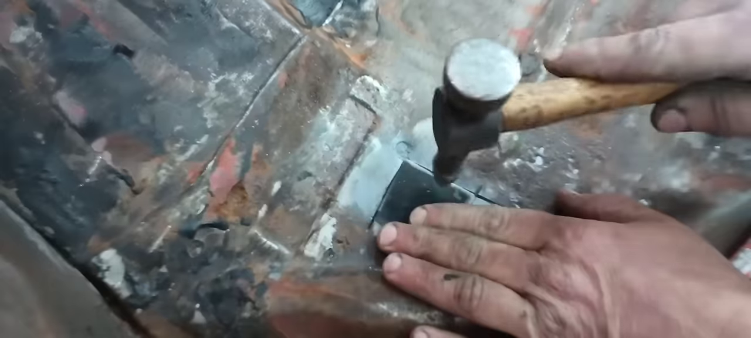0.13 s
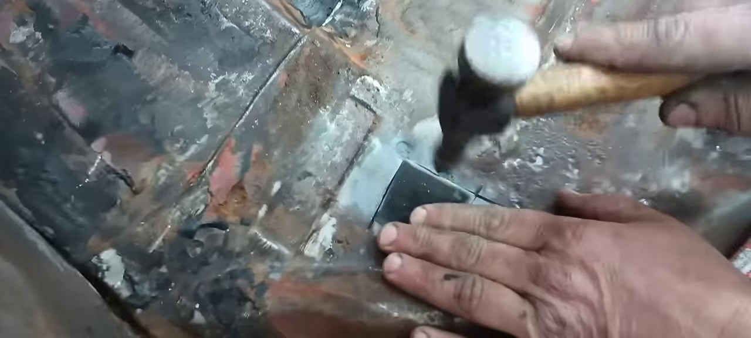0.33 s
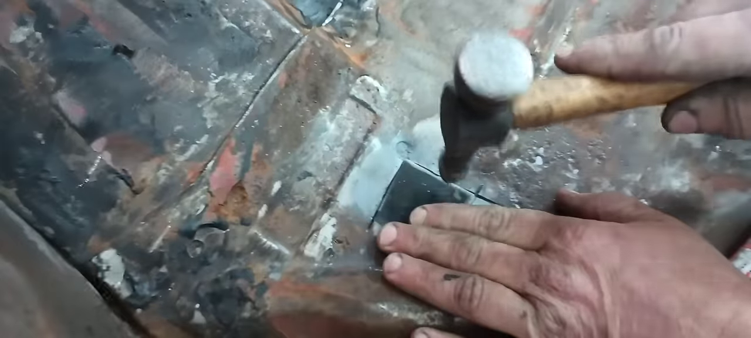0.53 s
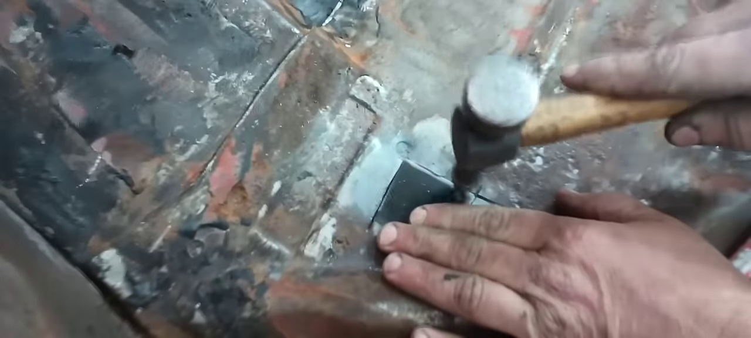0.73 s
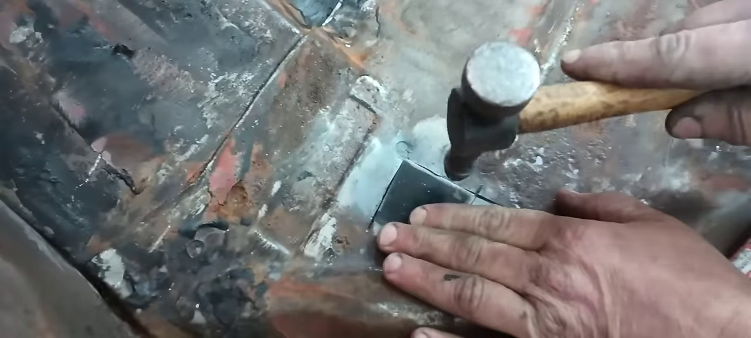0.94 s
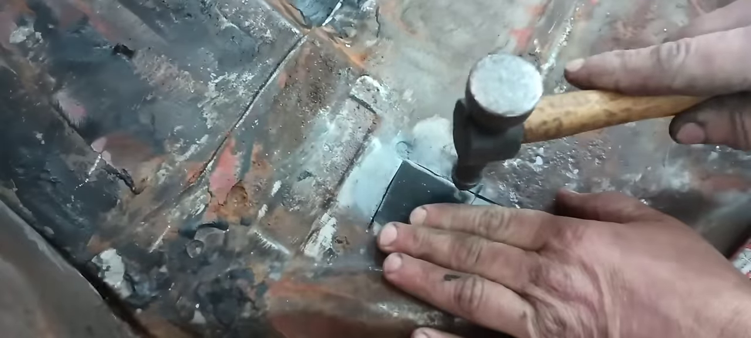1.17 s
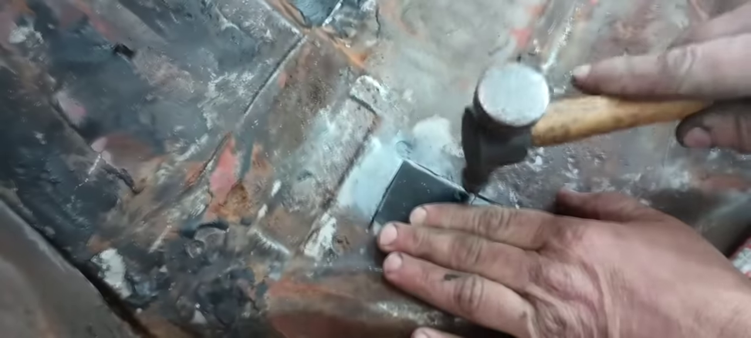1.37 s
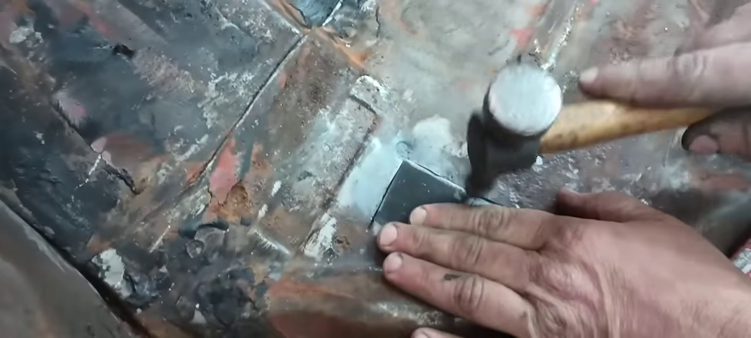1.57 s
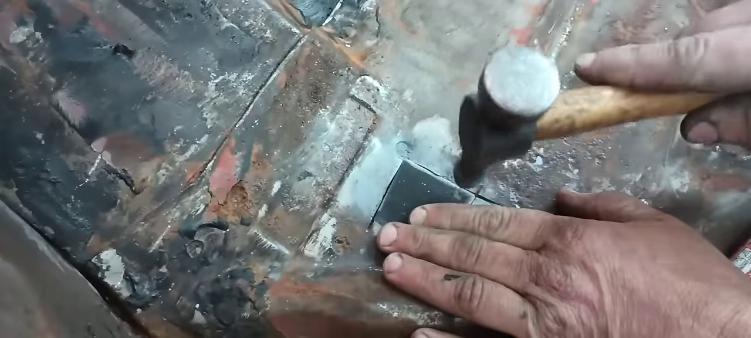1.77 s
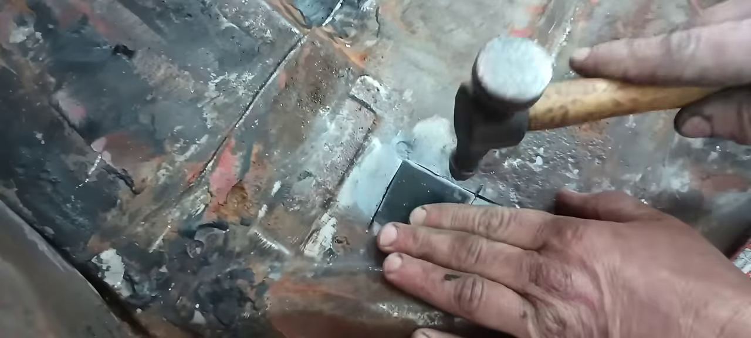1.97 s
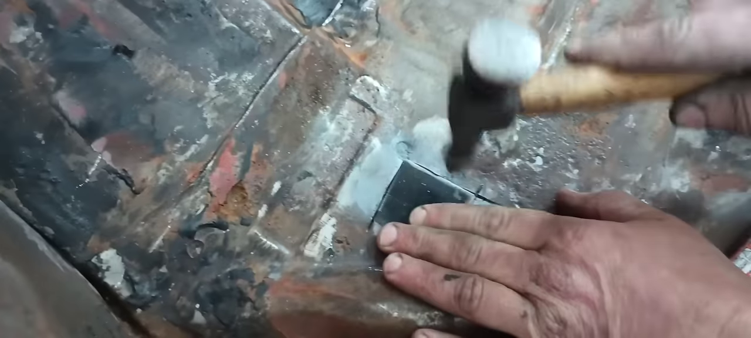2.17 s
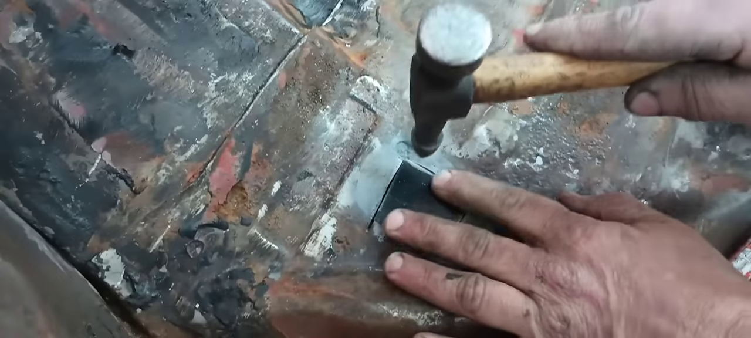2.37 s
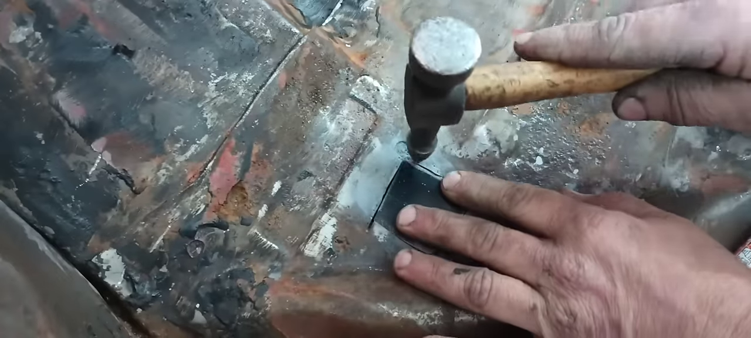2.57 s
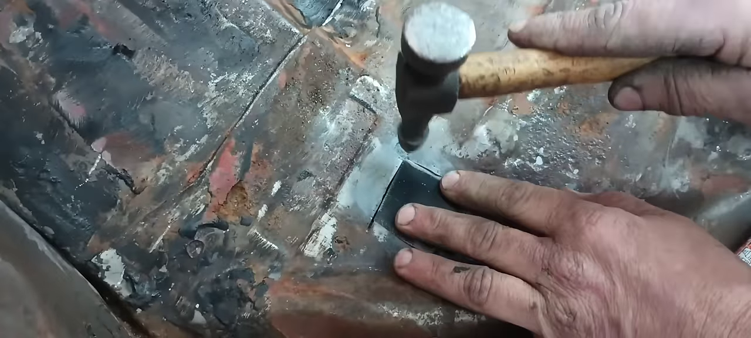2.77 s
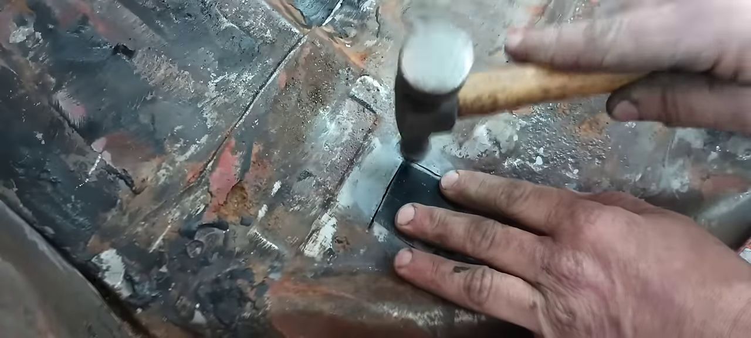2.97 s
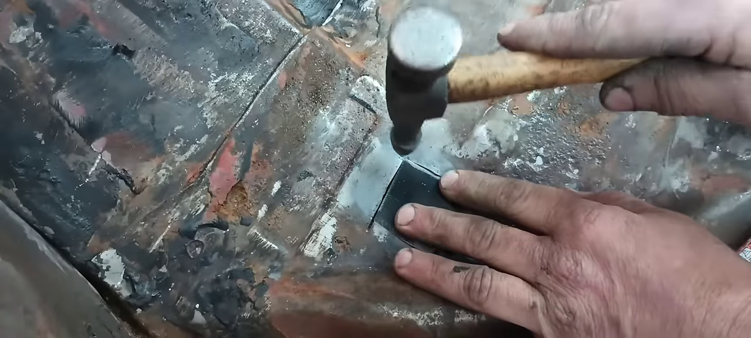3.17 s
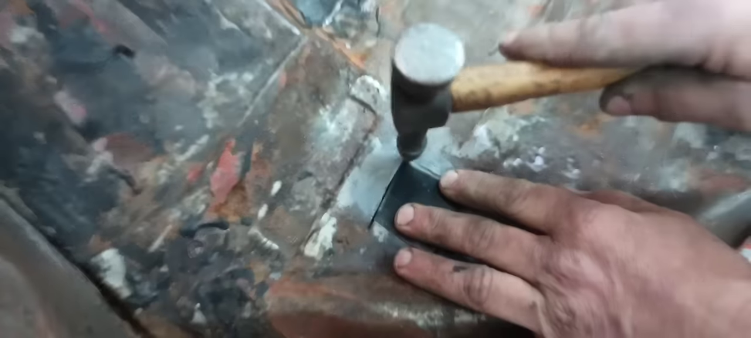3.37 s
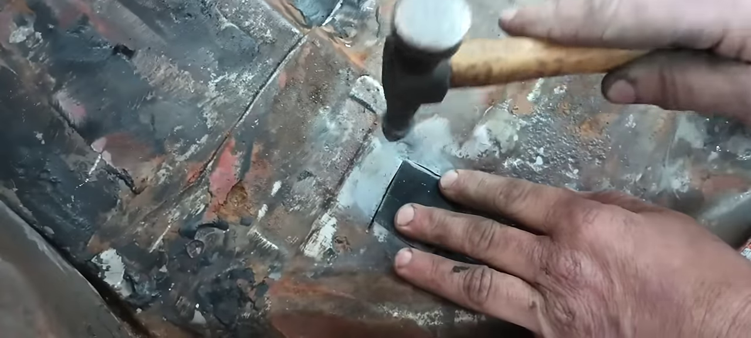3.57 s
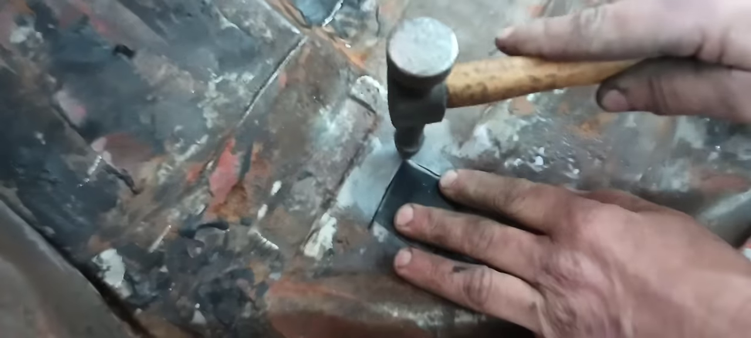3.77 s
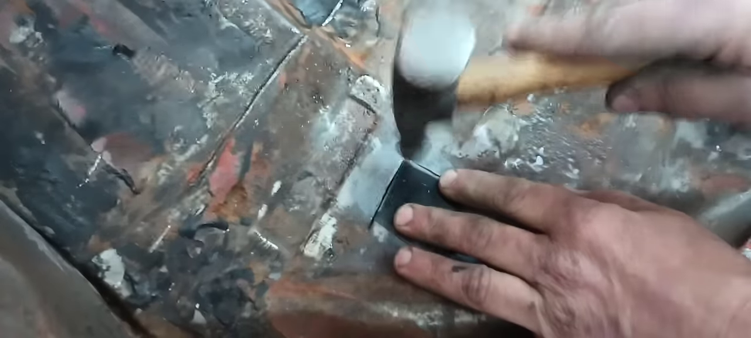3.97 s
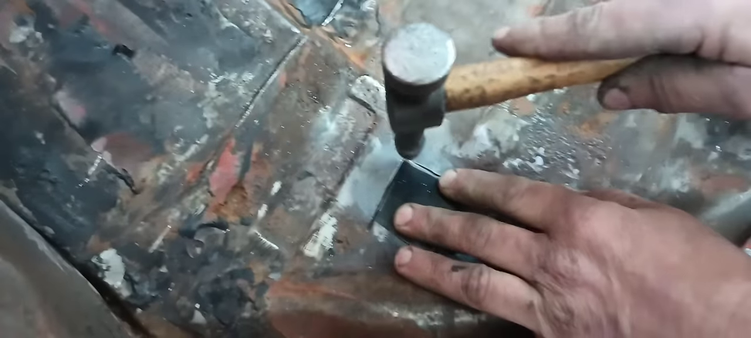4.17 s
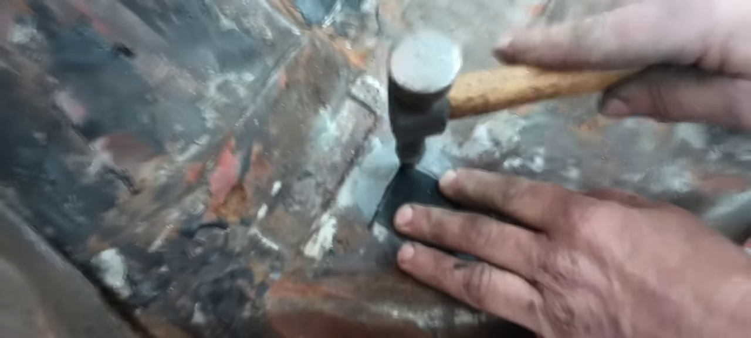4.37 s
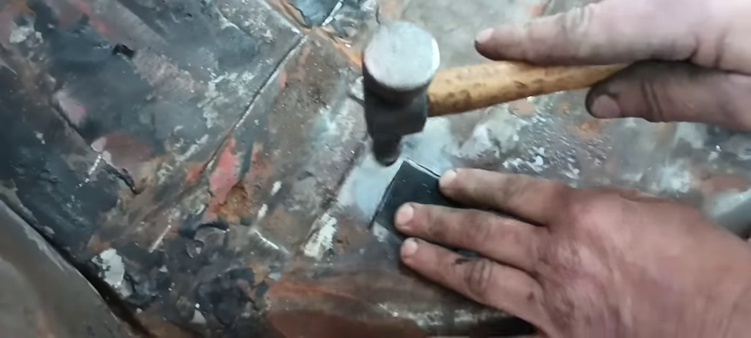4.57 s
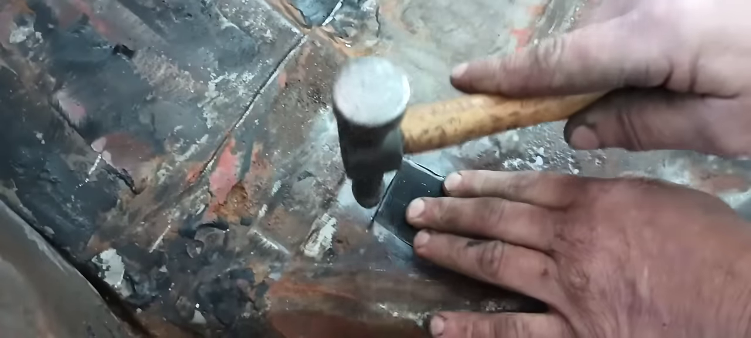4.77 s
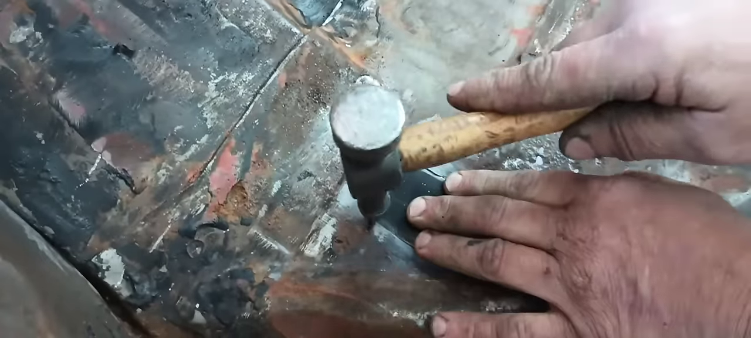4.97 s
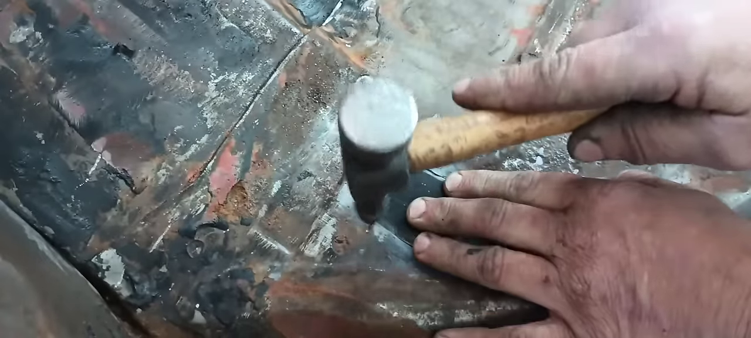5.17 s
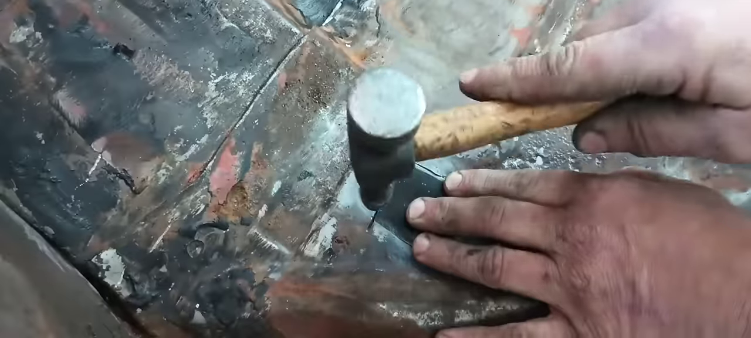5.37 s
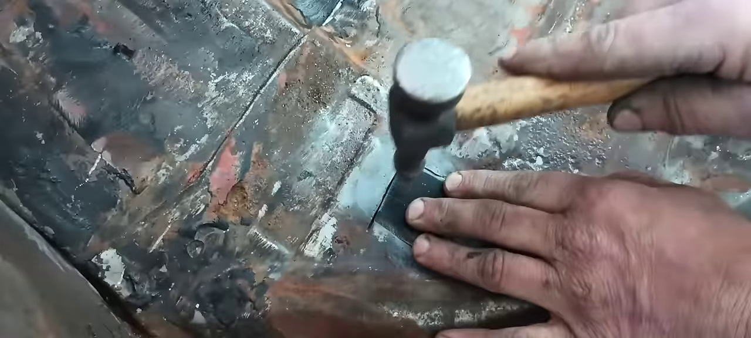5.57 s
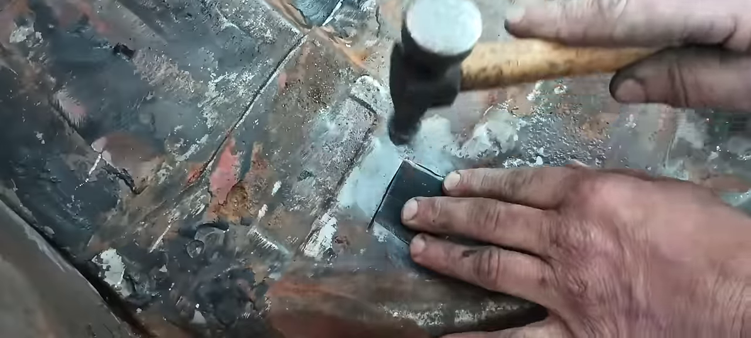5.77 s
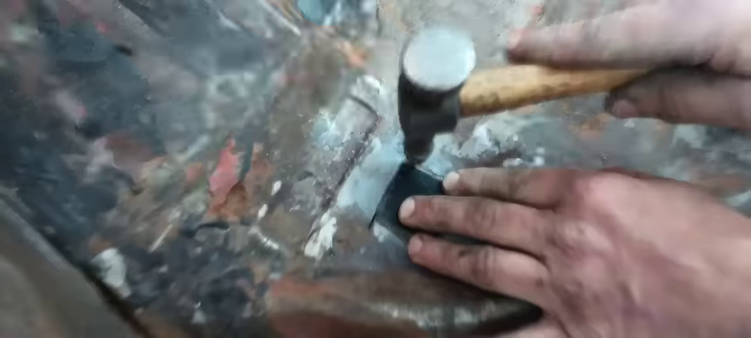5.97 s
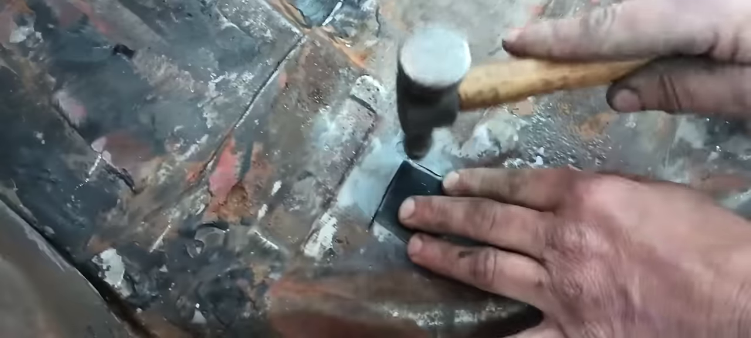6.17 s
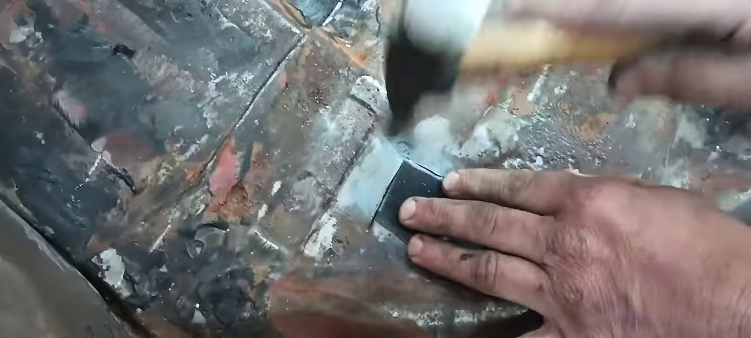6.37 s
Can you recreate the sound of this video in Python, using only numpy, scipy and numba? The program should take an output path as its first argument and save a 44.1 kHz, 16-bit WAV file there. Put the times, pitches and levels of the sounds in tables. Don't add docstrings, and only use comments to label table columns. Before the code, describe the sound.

The end of an earlier blow fades, then eight loud metallic hammer blows fall in quick succession on a car floor panel. A tiny tap follows, then five strong blows, two quiet knocks and one final hard hit. Low pan boom and thin high ringing follow the blows; noise suppression cuts the tails abruptly. Slight finger and grit scuffs are heard in the gaps. Close, overloaded phone microphone, garage.

```python
import sys
import numpy as np
from scipy import signal
from scipy.fft import rfft, irfft, next_fast_len
from scipy.io import wavfile
from scipy.ndimage import uniform_filter1d
from numba import njit

SR = 44100
rng = np.random.default_rng(int(sys.argv[2]) if len(sys.argv) > 2 else 0)


def unload_audio(sound):
    columns = np.transpose(np.atleast_2d(sound))
    steps = np.round(np.clip(columns, -1, 1) * 32767)
    wavfile.write(sys.argv[1], SR, steps.astype(np.int16))


def undo_db(level):
    steps = np.asarray(level, float) / 20
    return 10 ** steps


N = 282678
BAND_CENTRES_HZ = 45 * 2 ** np.arange(0, 8.5, 1 / 5)


def shape(table, hz):
    f, v = np.transpose(table)
    return np.interp(np.log(hz), np.log(np.maximum(f, 1)), v)


# f/Hz, correlation
LIKENESS = [(60, 0.85), (250, 0.93), (500, 0.12), (2000, .01), (16000, .01)]


def band(hz, width, lumps_db=0., lump_hz=45):
    size = next_fast_len(N)
    f = np.arange(size // 2 + 1) * SR / size
    inside = np.flatnonzero(abs(f - hz) < 1.6 * width)
    draw = rng.standard_normal((2, 2, len(inside)))
    lumps = np.interp((f[inside] - f[inside[0]]) / lump_hz, np.arange(400), rng.standard_normal(400))
    skirt = np.exp(-((f[inside] - hz) / width) ** 4)
    z = np.zeros((2, len(f)), complex)
    z[:, inside] = (draw[0] + 1j * draw[1]) * skirt * undo_db(lumps_db * lumps)
    like = np.clip(shape(LIKENESS, hz), 0, 1)
    mid, side = irfft(z, size)[:, :N] * np.sqrt([[1 + like], [1 - like]])
    pair = np.array([mid + side, mid - side])
    return pair / pair.std()


def band_width_db(hz):
    return 10 * np.log10(hz / 660)


# t/s, level/dB, clang/dB, hardness/dB, suppressor hold/s
BLOWS = [(.055, -2.5, -3, -1, .31), (0.397, -2.5, 1, -0.5, 0.32), (0.754, -4.5, -0.6, -2, .31),
         (1.039, -7.5, -4.5, -3.5, .4), (1.329, -2, -2.2, -6.5, .31), (1.602, -10.5, -5.5, -9.5, .31),
         (1.847, -3.5, 3.5, -1, .31), (2.056, -2, 5, 0, 0.25), (2.986, -4.5, -3, -12.5, 0.25),
         (3.358, -2, 0.5, -8.5, 0.28), (3.694, 1, 4.5, 2.5, .34), (4.0, 0.5, 3, -4.5, .32),
         (4.356, 1.5, 0.6, -6, 0.3), (5.958, 3, 0.1, -6.5, 0.41)]
# t/s, level/dB, suppressor hold/s, hum muted/s
TAPS = [
    (2.528, -25, 0.083, 0.19),
    (4.912, -21.5, 0.053, .24),
    (5.237, -17, 0.099, 0.38),
]


def hits():
    treble_hold_max_s, tap_bass_hold_s = 0.34, 0.13
    blows = [(s, min(hold, treble_hold_max_s), hold) for s, *rest, hold in BLOWS]
    taps = [(s, hold, tap_bass_hold_s) for s, db, hold, muted in TAPS]
    return np.array(blows + taps)


def let_through():
    t = np.arange(N) / SR
    patchy_db, patches_per_s, slide_s = 2.5, 14, .03
    steps = [(s, -46, -1.5) for s, *rest in BLOWS]  # s, hum dB, hiss dB
    for s, db, hold, muted in TAPS:
        steps += [(s, -57, -2), (s + muted, -53.5, 4.5)]
    s, hum_db, hiss_db = np.transpose(sorted(steps))
    last = np.searchsorted(s, t) - 1
    earlier_tail_db = -38.5 - 160 * t
    hum_db = np.where(last < 0, earlier_tail_db, hum_db[last])
    patches_db = patchy_db * rng.standard_normal(N)[(t * patches_per_s).astype(int)]
    hiss_db = np.where(last < 0, -11, hiss_db[last]) + patches_db
    return uniform_filter1d(np.array([hum_db, hiss_db]), max(int(slide_s * SR), 1), axis=1)


# f/Hz, level/dB per Hz
HUM = [(25, -7.5), (50, -21), (115, 4.5), (160, -4), (200, -0.5), (290, 0), (370, -1), (480, -7),
       (680, -3.5), (800, -14.5), (1500, -23.5), (3000, -28.5), (7000, -35), (12000, -49.5), (15300, -47.5)]


def garage_hum():
    hum_db, hiss_db = let_through()
    air = 0
    for hz in BAND_CENTRES_HZ:
        treble_share = np.clip(np.log2(hz / 700) / 2, 0, 1)
        level_db = shape(HUM, hz) + band_width_db(hz) + hum_db + hiss_db * treble_share - 10
        air = air + band(hz, hz / 13, lumps_db=3.4) * undo_db(level_db)
    return air


def forerunner(loud, early=0.0032, db=-21, hz=1200):
    dull = signal.lfilter(*signal.butter(2, hz, fs=SR), loud)
    return undo_db(db) * np.roll(dull, -int(early * SR), axis=1)


def contact():
    kick = np.zeros(N)
    for s, db, *rest in BLOWS:
        kick[int(s * SR)] = undo_db(db)
    size = int(.0007 * SR)
    shove = -np.convolve(kick, np.sin(np.pi * np.arange(size) / size))[:N]
    return signal.lfilter(*signal.butter(2, 150, "high", fs=SR), shove)


# f/Hz, level/dB per Hz
SHEET = [(24, -58), (40, -37.5), (97, -5), (172, -0.5), (278, -4), (461, -7.5), (639, -2), (782, -10),
         (933, -13), (1230, -11.5), (2040, -21), (6020, -37), (8360, -55.5), (15300, -77.5), (16500, -84)]
# f/Hz, t60/s
SHEET_T60 = [(60, 0.93), (160, .85), (420, 0.59), (1100, 0.56), (2900, 0.6), (7700, 0.24), (16000, 0.11)]
# f/Hz, level/dB per Hz
TAP_COLOURS = [
    [(35, -56), (60, -35), (240, -12), (366, -4), (675, -1), (938, -19), (1080, -23), (1190, -11.5),
     (1430, -11.5), (1690, -27), (1990, -26), (3340, -35.5), (5220, -55), (15000, -85), (16500, -85)],
    [(35, -49), (60, -18), (311, -3), (403, -14), (615, -29), (854, -29), (1010, -28), (1470, -24),
     (1990, -26), (2580, -21.5), (4430, -37), (5600, -34), (8350, -58), (15400, -63), (16500, -85)],
    [(35, -41), (60, -18.5), (219, 2), (318, -12.5), (442, -35), (559, -13), (759, -37.5), (1190, -17),
     (1300, -23), (1730, -24.5), (4030, -27), (7250, -28.5), (8350, -48), (15400, -31.5), (16500, -54)],
]


def colours(hz):
    overdrive_db = -0.74
    blows = []
    for s, db, clang, hard, hold in BLOWS:
        boom = -8 - 0.9 * db
        bite = 1.65 + 0.2 * hard
        tilt = [(150, boom), (450, 0.012), (1500, clang), (5000, bite), (12000, hard)]
        blows.append(shape(tilt, hz) + db + overdrive_db)
    plain = shape(SHEET, hz) + 6 / shape(SHEET_T60, hz)
    taps = [shape(own, hz) - plain + db + 12 for (s, db, *holds), own in zip(TAPS, TAP_COLOURS)]
    return np.array(blows + taps)


@njit
def ring(starts, hz, t60, rise, gain):
    out = np.zeros((2, N))
    for h in range(len(starts)):
        for m in range(len(t60)):
            p = np.exp(2j * np.pi * hz[h, m] / SR - np.log(1000) / (t60[m] * SR))
            q, z, r = np.exp(-1 / (rise[m] * SR)), 1 + 0j, 1.
            stop = starts[h] + int(min(t60[m], .6) * SR)
            for i in range(starts[h], min(N, stop)):
                z, r = z * p, r * q
                w = (1 - r) * min(1., (stop - i) / 4000)
                out[0, i] += w * (z * gain[h, m, 0]).imag
                out[1, i] += w * (z * gain[h, m, 1]).imag
    return out


# f/Hz, level/dB, t60/s
PANEL = [(102.4, -7, 1.3), (129.2, -2, 1.2), (181.5, -15.5, 1.8), (200.8, -7, 0.66), (234.6, -17.5, 2.8),
         (297, 1.5, 0.43), (299.7, 2.5, .5), (356.2, 2.5, 0.3), (385.2, 6.5, 0.34), (471.4, -1, 0.33),
         (503, -6, 1.1), (560.7, 2, .5), (602, -13, 0.64), (635.6, -3, 0.65), (631, -4.5, 0.38),
         (667, -7.5, 0.45), (700.3, 0, 0.5), (840, -20.5, .5), (1010, -18.5, 0.13), (1071, -17, .7),
         (1125, -15, .45), (1195, -22, 1.8), (1265, -20, .8), (1400, -20, 1.1), (1685, -24, .8),
         (2590, -30, .6)]


def panel(rows, strong_db=-10, scatter_db=2.5, turns=0.89):
    f, db, t60 = np.transpose(PANEL[:17])
    chance = rng.standard_normal((len(rows), len(f), 4))
    size = undo_db(db + strong_db + colours(f) + scatter_db * chance[..., 0])
    apart = np.arccos(np.clip(shape(LIKENESS, f), 0, 1)) * chance[..., 1]
    phase = 3 * chance[..., 2, None] + apart[..., None] * [.5, -.5]
    gain = size[..., None] * np.exp(1j * phase)
    starts = (rows[:, 0] * SR).astype(np.int64)
    return ring(starts, f * (1 + 0.0023 * chance[..., 3]), t60, turns / f, gain)


def fading(rows, hz, t60, rise, uneven_db):
    kick = np.zeros(N)
    kick[(rows[:, 0] * SR).astype(int)] = undo_db(2 * (colours(hz) + uneven_db))
    slow, quick = np.exp(-2 * np.log(1000) / (t60 * SR)), np.exp(-1 / (rise * SR))
    power = signal.lfilter([1 - quick], np.convolve([1, -slow], [1, -quick]), kick)
    return np.sqrt(np.maximum(power, 0))


# f/Hz, level/dB per Hz
CRACK = [(300, -16.5), (1500, -3), (4000, -7.5), (7000, -12.5), (12000, -21.5), (15200, -27), (16800, -21)]
# f/Hz, t60/s
CRACK_T60 = [(1000, 0.22), (5000, 0.19), (9000, 0.075), (15000, 0.11)]


def wash_crack_and_tick(rows, wash_db=-12, crack_db=-22, tick_db=-34, tick_t60=0.03, turns=0.97):
    thinning = [(700, -3.5), (1200, -10), (5000, -9), (8000, 0)]  # Hz, dB
    tick_colour = [(1500, -8), (3500, -1.5), (8000, -17), (15000, -11)]  # Hz, dB per Hz
    steel = 0
    for hz in BAND_CENTRES_HZ:
        noise = band(hz, hz / 13, lumps_db=3.4) * undo_db(band_width_db(hz))
        uneven_db = 1.5 * rng.standard_normal(len(rows))
        t60 = shape(SHEET_T60, hz) * undo_db(.5 * rng.standard_normal())
        wash_level = undo_db(shape(SHEET, hz) + 6 / t60 + shape(thinning, hz) + wash_db)
        wash = wash_level * fading(rows, hz, t60, turns / hz, uneven_db)
        crack_fade = fading(rows, hz, shape(CRACK_T60, hz), 1 / hz, uneven_db)
        crack = undo_db(shape(CRACK, hz) + crack_db) * crack_fade
        tick = undo_db(shape(tick_colour, hz) + tick_db) * fading(rows, hz, tick_t60, 1 / hz, 0)
        steel = steel + noise * (wash + crack + tick)
    return steel


def throbbing(rows):
    out = np.zeros((2, N))
    for (s, hz, db, t60), chance in zip(rows, rng.uniform(0, 2 * np.pi, (len(rows), 3, 1))):
        start = int(s * SR)
        t = np.arange(min(int(.55 * SR), N - start)) / SR
        throb = (1 + .4 * np.cos((40 + 8 * chance[2]) * t)) / 1.2
        fade = np.minimum(t / .002, 1) * np.clip((min(.42 * t60, .55) - t) * 14, 0, 1)
        tone = np.sin(2 * np.pi * hz * t + chance[:2] / 4)
        out[:, start:start + len(t)] += undo_db(db - 60 * t / t60) * throb * fade * tone
    return out


# f/Hz, level/dB, t60/s
RINGS = [(1200, -49, 1.8), (1270, -47, 1.4), (1405, -50, 1.4), (1946, -46, 1.1), (2546, -52, 1.0),
         (3430, -55, .85), (4264, -52, 1.0), (5195, -58, .8)]


def pan_rings():
    rows = []
    for s, force, *rest in BLOWS:
        for hz, db, t60 in RINGS:
            own_db = 3 * rng.standard_normal()
            rows.append((s, hz, db + 1.3 * force + own_db, t60))
    return throbbing(rows)


# t/s, f/Hz, bandwidth/Hz, length/s, level/dB
SCUFFS = [(.329, 3500, 1500, .015, -55), (1.21, 7000, 2500, .015, -60), (2.27, 15300, 1500, .02, -69),
          (2.365, 140, 120, .025, -37), (2.42, 14500, 3000, .07, -82), (2.49, 6100, 400, .02, -66),
          (2.485, 8500, 5000, .025, -73), (2.902, 2200, 1600, .005, -60), (4.63, 14000, 4000, .035, -81),
          (4.8, 14000, 4000, .035, -81), (5.175, 3150, 500, .025, -65), (5.17, 14000, 4000, .03, -82),
          (5.41, 7400, 1000, .02, -66), (5.49, 130, 160, .06, -45)]


def scuffs():
    t = np.arange(N) / SR
    out = 0
    for s, hz, wide, length, db in SCUFFS:
        out = out + undo_db(db) * band(hz, wide / 2) * np.exp(-((t - s) / length * 0.87) ** 2)
    return out


# t/s, f/Hz, level/dB, t60/s
TAP_RINGS = [(2.527, 1400, -38, .3), (2.527, 2700, -39, .16), (2.527, 2790, -45, .1),
             (2.527, 3300, -39, .16), (2.527, 2020, -45, .25), (4.914, 2550, -39, .35),
             (4.914, 2300, -43, .15), (4.914, 5400, -42, .1), (4.914, 7200, -46, .08),
             (4.914, 240, -28, .4), (5.238, 4780, -45, .45), (5.238, 4690, -44, .2),
             (5.238, 3350, -37, .25), (5.238, 4200, -42, .15), (5.238, 150, -32, .85),
             (5.238, 225, -25, .4)]


def tap_rings():
    return throbbing(TAP_RINGS)


def open_gain(depth_db, fade, late, order, duck_db=-9, ahead=0.036):
    t, rows = np.arange(N) / SR, hits()
    rows = rows[np.argsort(rows[:, 0])]
    last = np.maximum(np.searchsorted(rows[:, 0], t + 0.0013) - 1, 0)
    shut = np.clip((t - rows[last, 0] - rows[last, order] - late) / fade, 0, 1)
    soon = np.r_[rows[1:, 0], 99][last] - .005 - t
    return undo_db(depth_db * shut + duck_db * np.exp(-(soon / ahead) ** 2) * (0.5 - shut))


def scene():
    rows = hits()
    air = garage_hum()
    steel = contact() + panel(rows) + wash_crack_and_tick(rows)
    f = np.arange(N // 2 + 1) * SR / N
    bass = irfft(rfft(steel) / (1 + (f / 260) ** 8), N)
    gated_bass = bass * open_gain(-19.5, fade=0.03, late=0.015, order=2)
    gated_rest = (steel - bass) * open_gain(-13.5, fade=0.087, late=-0.023, order=1)
    gated = gated_bass + gated_rest
    mix = air + forerunner(np.clip(gated, -1, 1)) + gated + pan_rings() + scuffs() + tap_rings()
    return mix * undo_db(.6 * np.array([[.5], [-.5]]))


# f/Hz, width/Hz, level/dB
PORT = (15300, 800, 8)


def phone_input(dry):
    knee, top_hz = 24.0, 15900
    hz, width, db = PORT
    f = np.arange(N // 2 + 1) * SR / N
    port = undo_db(db * np.exp(-((f - hz) / width) ** 2))
    heard = irfft(rfft(dry) * port / (1 + (f / top_hz) ** 120), N)
    return heard / (1 + abs(heard) ** knee) ** (1 / knee)


def band_limit(x):
    return signal.sosfilt(signal.butter(12, 16960, fs=SR, output="sos"), x)


def record(dry):
    heard = phone_input(dry)
    return band_limit(heard)


dry = scene()
out = record(dry)
unload_audio(out)
```